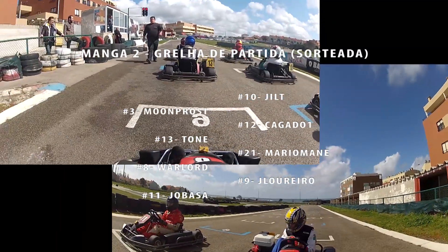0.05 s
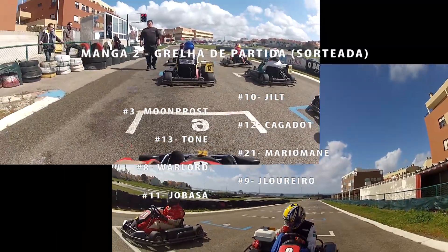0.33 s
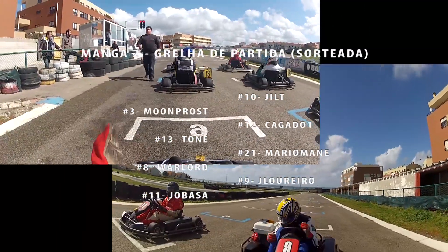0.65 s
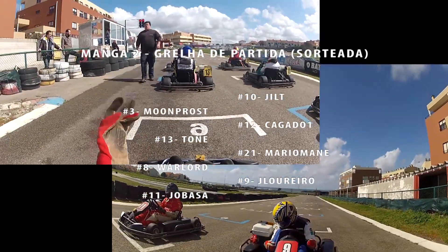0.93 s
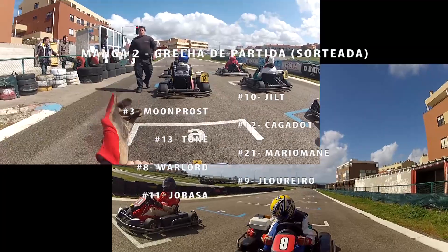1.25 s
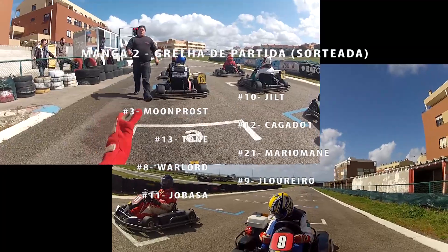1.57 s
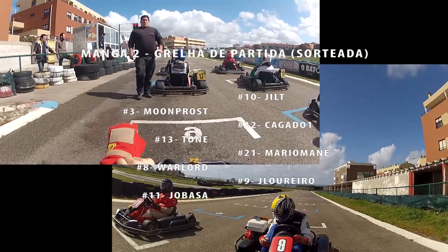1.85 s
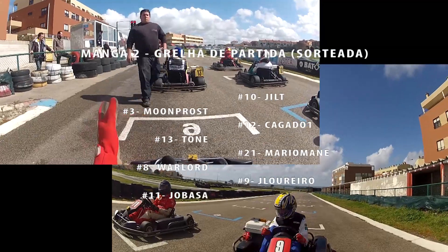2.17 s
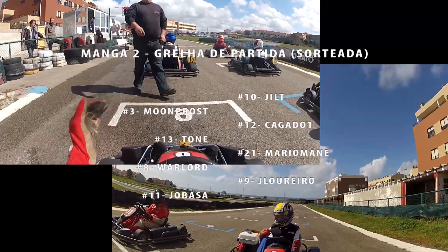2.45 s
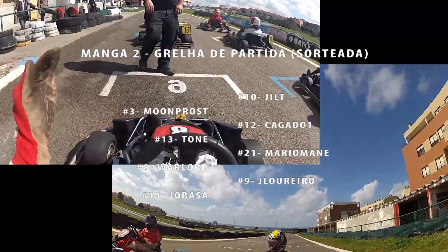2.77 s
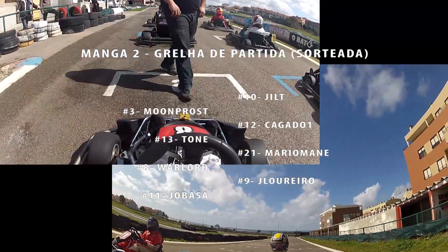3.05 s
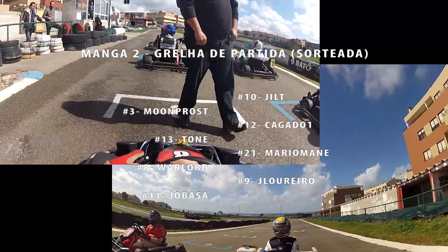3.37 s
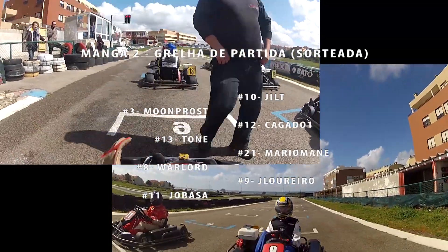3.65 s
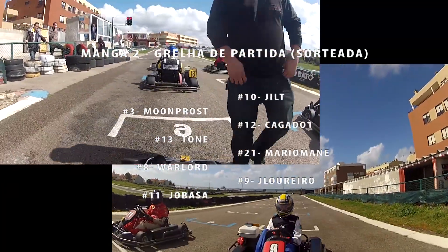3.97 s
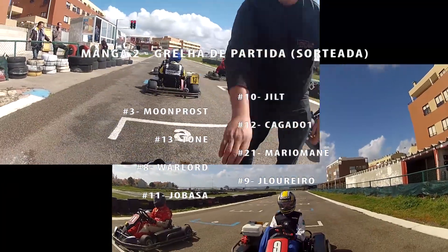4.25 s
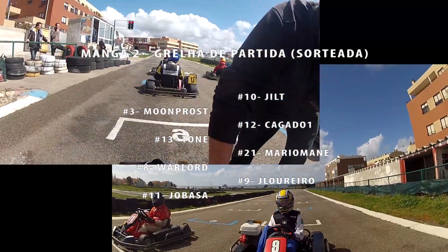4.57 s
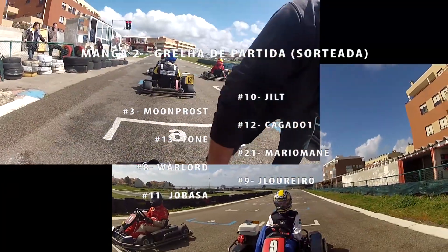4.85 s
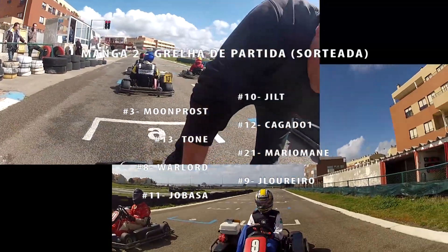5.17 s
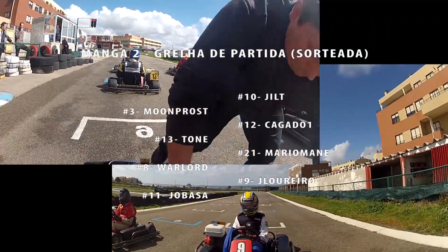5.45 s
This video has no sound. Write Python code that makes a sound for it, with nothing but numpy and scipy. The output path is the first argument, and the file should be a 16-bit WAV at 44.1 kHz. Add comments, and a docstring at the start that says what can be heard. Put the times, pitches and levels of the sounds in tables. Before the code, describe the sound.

From the seat of a go-kart waiting on a track, two nearby single-cylinder engines thump and chug at idle, one with a thin, high chirping, while more karts run unevenly behind them. Partway through, something loose gives a couple of light, buzzing rattles. A deep rumble swells in the last second, and a sharp knock on plastic bodywork comes just before the end.

```python
"""Go-karts idling on the starting grid

Microphone in a driver's seat, among single-cylinder engines. Close by, one thumps and one chugs with a
brief squeal in every cycle; the others beat against them further off. A loose part rattles in bouts.
Near the end a rumble rises and bodywork takes a knock. The recorder's coarse sampling adds a fizzy top."""
import sys
import numpy as np
from scipy import signal
from scipy.fft import rfft, irfft
from scipy.io import wavfile
from scipy.ndimage import map_coordinates

SR = 44100
rng = np.random.default_rng(int(sys.argv[2]) if len(sys.argv) > 2 else 0)


def digitize_waveform(pressure):
    """Quantize a signal to 16-bit integers and store it at the path in sys.argv[1].

    Rows of a 2-D input are taken as channels; values are limited to [-1, 1].
    """
    field = np.atleast_2d(pressure).T
    bounded = np.clip(field, -1, 1)
    quanta = np.round(bounded * 32767).astype(np.int16)
    wavfile.write(sys.argv[1], SR, quanta)


N = 251792
TIME = np.arange(N) / SR

# idle speed of the squealing kart: time_s, firings_per_s
SQUEALER_IDLE = [(0, 14.149), (.4, 14.267), (1.3, 14.067), (2.8, 14.088), (3.7, 14.396), (5.7, 14.301)]


def amp(db):
    return 10 ** (np.asarray(db) / 20)


def unit(x):
    return x / np.sqrt(np.mean(x ** 2) + 1e-20)


def curve(rows):
    """Rows of (time_s, value), joined by straight lines."""
    return np.interp(TIME, *np.transpose(rows))


def colour(x, points):
    """Filters x by (frequency_hz, gain_db) points, to rms 1."""
    hz, db = np.transpose(points)
    size = 2 ** 18
    bins = np.fft.rfftfreq(size, 1 / SR)
    gain = amp(np.interp(np.log(bins + 1), np.log(hz), db))
    return unit(irfft(rfft(x, size) * gain)[:N])


def wander(rate):
    """Smooth random drift of rms near 1 that changes about rate times a second."""
    knots = rng.standard_normal(4096)
    return map_coordinates(knots, [TIME * rate], order=2, mode="wrap")


def clicks(times, sizes):
    """A train of single impulses."""
    out = np.zeros(N)
    samples = np.round(np.asarray(times) * SR).astype(int)
    np.add.at(out, np.clip(samples, 0, N - 1), sizes)
    return out


def scatter(x, t60, wet):
    """The direct sound and a dense cluster of dying echoes."""
    t = TIME[:SR // 3]
    echoes = rng.standard_normal(len(t)) * amp(-60 * t / t60)
    return x + wet * signal.oaconvolve(x, echoes / np.linalg.norm(echoes))[:N]


def ring(x, modes):
    """Strikes a set of (pitch_hz, level_db, t60_s) modes with x."""
    t = TIME[:SR // 4]
    response = sum(amp(db - 60 * t / t60) * np.sin(2 * np.pi * hz * t) for hz, db, t60 in modes)
    return signal.oaconvolve(x, response / abs(response).max())[:N]


def cycles(speed):
    """Running count of engine cycles, from firings per second."""
    return np.cumsum(speed) / SR


def firings(turns, place, uneven_db, jitter):
    """One impulse a cycle; at idle no two burn alike. Place and jitter are in cycles."""
    size, offset = rng.standard_normal((100, 2)).T
    at = np.arange(len(size)) + place + jitter * offset
    inside = (at > turns[0]) & (at < turns[-1])
    return clicks(np.interp(at, turns, TIME), inside * amp(uneven_db * np.tanh(size)))


def puffs(turns, place, length):
    """Noise that bursts at one place in each cycle and dies away over length cycles."""
    return unit(np.exp(-((turns - place) % 1) / length) * rng.standard_normal(N))


def rumble():
    """Deep bass under the engines, up for about the last second."""
    # course of the rumble: time_s, level_db
    levels = [(0, -43), (4.3, -41), (4.65, -31), (5.3, -33), (5.7, -34)]
    # its spectrum: frequency_hz, gain_db
    spectrum = [(10, -22), (25, -2), (50, -6), (75, -4), (160, -40), (600, -80)]
    return amp(curve(levels)) * colour(rng.standard_normal(N), spectrum)


def far_karts():
    """The rest of the grid, each idle drifting by itself: (cycle count, relative_db) per kart."""
    # distant engines: firings_per_s, relative_db
    idles = [(13.55, -3), (16.1, 0), (14.6, -1), (12.1, -0.5), (15.7, 1), (13.9, -1.5)]
    return [(cycles(speed + .13 * wander(rate=1.5)) + rng.random(), db) for speed, db in idles]


def far_exhausts(pack, swell_db):
    """The far exhausts reach the microphone mostly as echoes from karts, tyre walls and buildings."""
    # exhaust spectrum at a distance: frequency_hz, gain_db
    spectrum = [(12, -34), (28, -29), (60, 4.5), (90, 1), (150, 5.5), (210, 2), (270, 0.5), (350, -1.5),
                (450, -5), (625, -4.5), (690, -15.5), (800, -28.5), (1100, -32), (2000, -42.5)]
    out = np.zeros(N)
    for turns, db in pack:
        pops = unit(firings(turns, 0, uneven_db=0, jitter=.0085))
        gas = .64 * puffs(turns, 0, length=.53)
        out += amp(db) * scatter(pops + gas, t60=.3, wet=5)
    return amp(swell_db - 21) * colour(out, spectrum)


def clatter(thumper, squealer, pack, swell_db):
    """Valve gear and pistons tick in step with each engine, over the even rush of the cooling fans."""
    # spectrum of the mechanical noise: frequency_hz, gain_db
    spectrum = [(400, -17), (800, 2.5), (1050, -2), (1430, 0), (1700, -2), (1900, 3.5), (2090, 5.5),
                (2300, 2.5), (2600, 0.5), (3050, 1.5), (3300, -7.5), (4000, -8.5), (4650, -10),
                (5600, -19.5)]
    ticks = .68 * puffs(thumper, .97, length=.034) + .56 * puffs(thumper, .04, length=.19)
    ticks += puffs(squealer, .023, length=.33)
    for turns, db in pack:
        ticks += amp(db - 12.5) * (puffs(turns, 0, length=.036) + 1.2 * puffs(turns, .4, length=.08))
    fans = rng.standard_normal(N)
    return colour(amp(-2.5) * unit(ticks) + fans, spectrum) * amp(.87 * swell_db - 35.5)


def rattle():
    """A loose part buzzes briefly at each tap; within a bout the taps swell, fade and come ever faster."""
    # bouts of rattling: start_s, tap_count, relative_db
    bouts = [(1.769, 9, -35), (2.665, 1, -34), (2.961, 6, -32.5)]
    # modes of the loose part: pitch_hz, relative_db, t60_s
    part_modes = [(2840, -5, .03), (3410, 1, .025), (3780, -2, .025), (4594, -0.5, 0.055), (4700, -7, .04),
                  (4820, -6, 0.032)]
    first_gap_s, last_gap_s, buzz_s, arch_db = .068, .057, .0033, 4
    taps = np.zeros(N)
    for start, number, db in bouts:
        count = round(number)
        gaps = np.linspace(first_gap_s, last_gap_s, count - 1)
        times = start + np.cumsum(np.append(0, gaps))
        arch = np.sin(np.pi * np.linspace(0, 1, count) ** .8)
        taps += clicks(times, amp(db + arch_db * (arch - .5)))
    buzz = signal.oaconvolve(taps, np.exp(-TIME[:SR // 10] / buzz_s))[:N] * rng.standard_normal(N)
    return amp(6.5) * ring(taps + .11 * buzz, part_modes)


def knock():
    """Hard clicks ring the frame; the slower push behind each booms in a plastic panel."""
    # blows on the bodywork, levels relative: start_s, click_db, thud_db, thud_centre_hz
    blows = [(5.285, -48, -8.5, 447), (5.372, -46, -7.5, 282), (5.556, -7.5, -18, 402),
             (5.5584, -5, -14, 397), (5.5653, -18, -2.5, 468), (5.582, -18, -1, 333),
             (5.606, -40, -11.5, 470)]
    # modes of the frame: pitch_hz, relative_db, t60_s
    frame_modes = [(1265, -16, .06), (2080, -5, .02), (2330, -4, .02), (2670, 1, .02), (2900, -2, .018),
                   (3176, -1, .017), (3450, -4, .015), (4732, -9, .02)]
    # modes of the panel: pitch_hz, relative_db, t60_s
    panel_modes = [(200, -14, .06), (277, 3.5, 0.041), (339, 6, 0.039), (406, -7, 0.029), (459, 6.5, 0.043),
                   (580, -16, 0.03), (740, -6, .06)]
    starts, click_db = np.transpose(blows)[:2]
    contact = scatter(clicks(starts, amp(click_db)), t60=.089, wet=.76)
    crack = signal.sosfilt(signal.butter(4, [2200, 5000], "band", fs=SR, output="sos"), contact)
    out = amp(1) * ring(contact, frame_modes) + amp(13.5) * crack
    for start, _, thud_db, centre_hz in blows:
        # the spot that is struck favours the modes near one pitch
        modes = [(hz, db - 18 * abs(np.log2(hz / centre_hz)), t60) for hz, db, t60 in panel_modes]
        onset = np.clip((TIME - start) / .0038, 0, 1)
        out += ring(clicks([start], amp(thud_db + 8)), modes) * onset
    return out


def squeal(turns):
    """Once a cycle a dry part rubs and sings; its pitch follows the engine and lifts with the pressure."""
    # the part loses its grip, so the squeal fades and flattens: time_s, depth_db
    slips = [(.8, 7.5), (2.03, 7), (3.02, 5.5), (5.1, 4)]
    rise_cycles, fall_cycles, rest_pressure = .11, .14, .0397
    pitch_hz, hz_per_firing_rate, slip_hz_per_db, slip_s = 2358, 70.1, 4, .09
    place = (turns + .035) % 1
    pressing = np.sin(np.pi / 2 * np.minimum(place / rise_cycles, 1))
    release = np.exp(-np.maximum(place - rise_cycles, 0) / fall_cycles)
    pressure = rest_pressure + (1 - rest_pressure) * pressing * release
    slip_db = sum(db * np.exp(-((TIME - at) / slip_s) ** 2) for at, db in slips)
    speed = curve(SQUEALER_IDLE)
    hz = pitch_hz + hz_per_firing_rate * (speed - speed.mean()) - slip_hz_per_db * slip_db
    hz += 28 * (pressure - 1) + 20 * wander(rate=220)
    angle = 2 * np.pi * np.cumsum(hz) / SR
    tone = np.sin(angle) + amp(-23) * np.sin(2 * angle)
    flicker_db = .86 * wander(rate=12) + wander(rate=70)
    return amp(-26.5 - slip_db + flicker_db) * pressure * tone


def near_exhaust(turns, pulses, pipe, uneven_db, jitter, rough):
    """Gas pulses, each trailed by turbulence, ring the silencer."""
    drive = sum(amp(db) * firings(turns, place, uneven_db, jitter) for place, db in pulses)
    gas = sum(amp(db) * puffs(turns, place, length=.24) for place, db in pulses)
    t = TIME[:SR // 4]
    response = sum(amp(db) * width * np.exp(-np.pi * width * t) * np.cos(2 * np.pi * hz * t)
                   for hz, width, db in pipe)
    ringing = signal.oaconvolve(unit(drive) + rough * unit(gas), response)[:N]
    passband = signal.butter(5, [20, 680], "band", fs=SR, output="sos")
    return unit(signal.sosfilt(passband, ringing))


def chugging_engine(turns):
    """The squealing kart's exhaust, close by: four rough, uneven gas pulses a cycle."""
    # gas pulses: place_cycles, relative_db
    pulses = [(.49, -4), (.72, -7), (.85, 0), (.01, -2)]
    # silencer resonances: pitch_hz, width_hz, relative_db
    pipe = [(77, 26, -3.5), (118.6, 26, 2.5), (159, 39, -0.5), (263.6, 12, -4), (338, 40, -11),
            (423, 60, -13.5), (545, 58, -16.5)]
    return amp(-29.5) * near_exhaust(turns, pulses, pipe, uneven_db=4, jitter=.0041, rough=.64)


def thumping_engine(turns):
    """A close engine whose thumps swell and fade about twice a second."""
    # gas pulses, one strong and one weak: place_cycles, relative_db
    pulses = [(.735, 0), (.23, -14)]
    # silencer resonances: pitch_hz, width_hz, relative_db
    pipe = [(66, 22, -1), (109, 31, -13), (126, 32.6, 10.5), (189, 44, -4), (275, 36, -35), (575, 76, -43)]
    swell_db, swell_hz = 1.3, 2.17
    level_db = -27.5 + swell_db * np.cos(2 * np.pi * swell_hz * TIME) + wander(rate=4.02)
    return amp(level_db) * near_exhaust(turns, pulses, pipe, uneven_db=1.5, jitter=.003, rough=.2)


def scene():
    """From the seat, in mono: two near engines and the rest of the grid, at slightly different speeds."""
    # idle speed of the thumping kart: time_s, firings_per_s
    thumper_idle = [(0, 12.885), (.4, 12.773), (2.5, 12.967), (2.8, 12.705), (3.7, 12.811), (5.7, 12.725)]
    thumper, squealer = cycles(curve(thumper_idle)), cycles(curve(SQUEALER_IDLE))
    pack = far_karts()
    engines = thumping_engine(thumper) + chugging_engine(squealer)
    swell_db = .5 * wander(rate=1.43)  # far exhausts and clatter swell and sink together
    engines += far_exhausts(pack, swell_db) + clatter(thumper, squealer, pack, swell_db)
    return (engines + rumble() + squeal(squealer) + rattle() + knock())[None]


def record(dry):
    """The recorder holds each coarse sample, mirroring the sound into the treble, then limits the band."""
    coarse_hz, repeats, edge_hz = 12000, 4, 15350
    coarse = signal.resample_poly(dry, coarse_hz, SR, axis=1)
    steps = np.repeat(coarse, repeats, axis=1)
    held = signal.resample_poly(steps, SR, repeats * coarse_hz, axis=1)[:, :N]
    lowpass = signal.firwin(511, edge_hz, window=("kaiser", 9), fs=SR)
    return signal.oaconvolve(held, lowpass[None], "same")


dry = scene()
out = record(dry)
digitize_waveform(out)
```